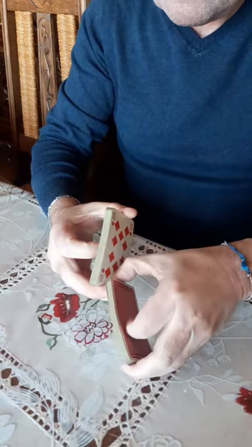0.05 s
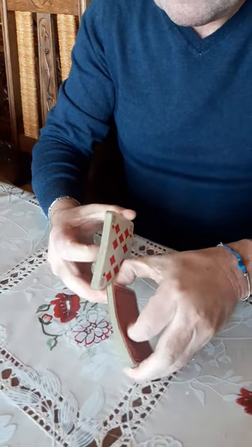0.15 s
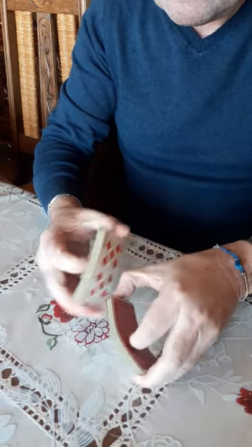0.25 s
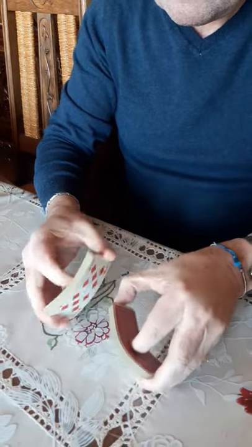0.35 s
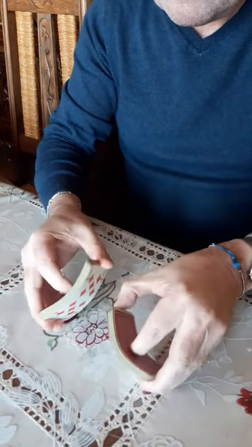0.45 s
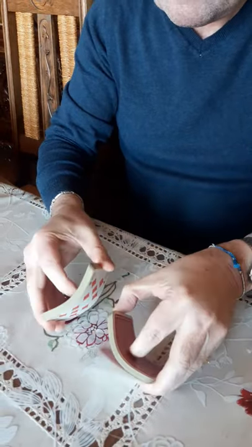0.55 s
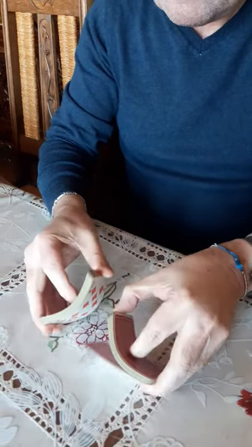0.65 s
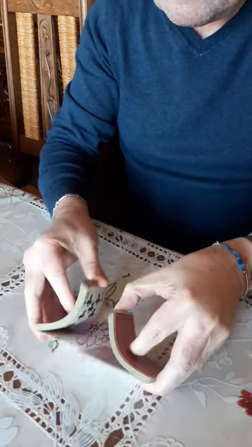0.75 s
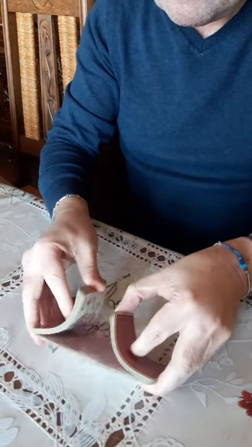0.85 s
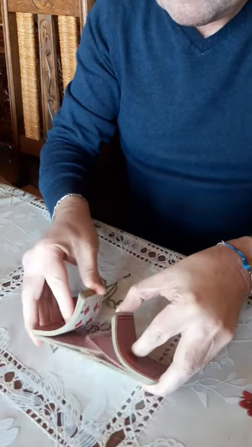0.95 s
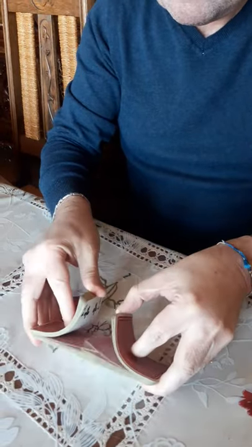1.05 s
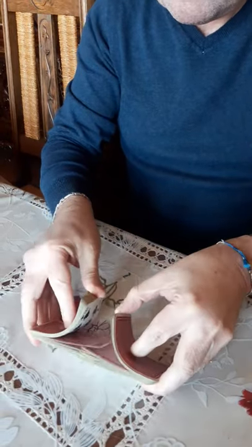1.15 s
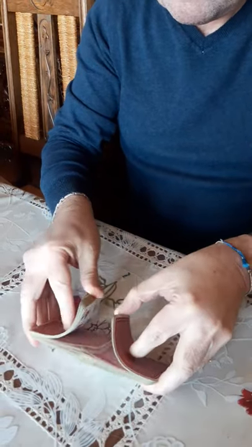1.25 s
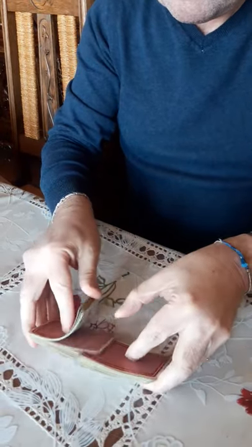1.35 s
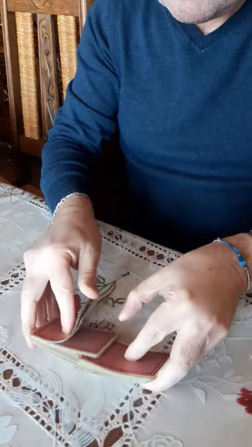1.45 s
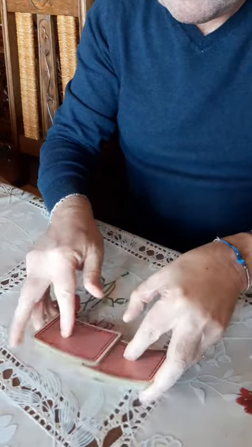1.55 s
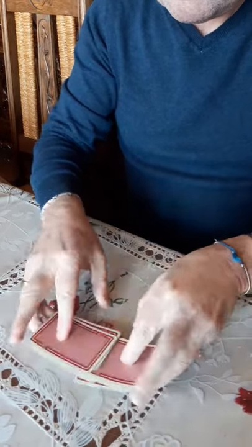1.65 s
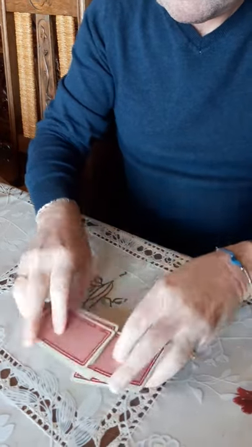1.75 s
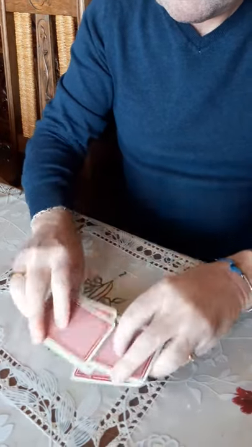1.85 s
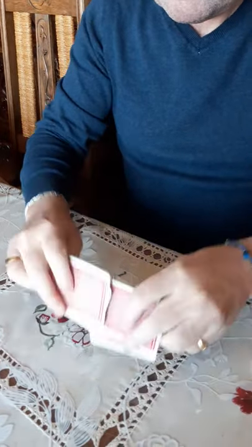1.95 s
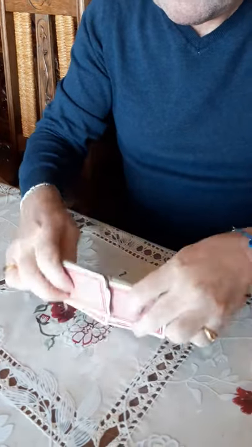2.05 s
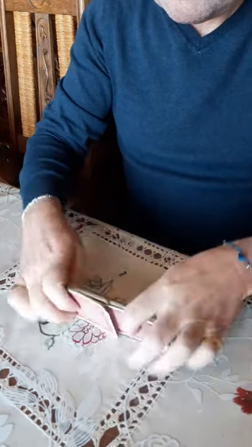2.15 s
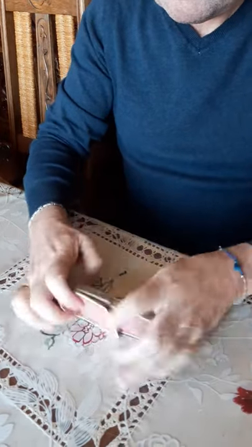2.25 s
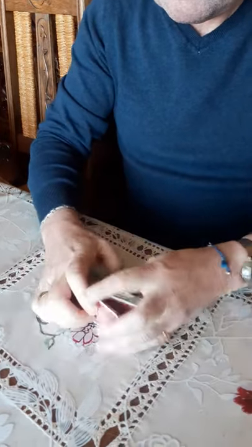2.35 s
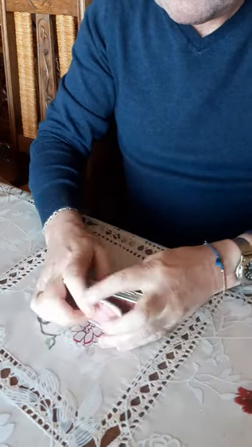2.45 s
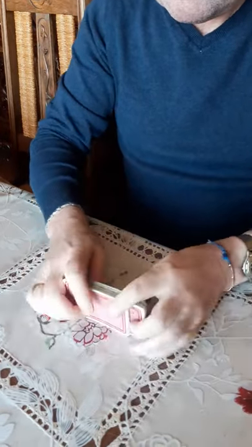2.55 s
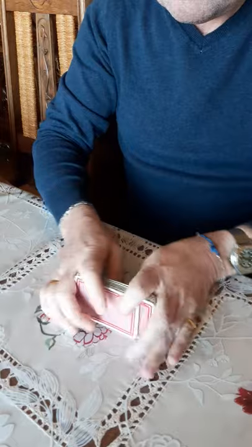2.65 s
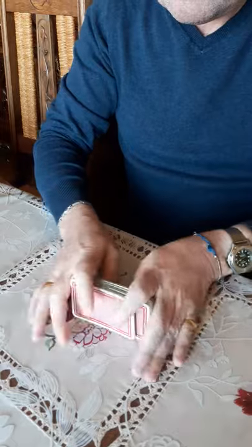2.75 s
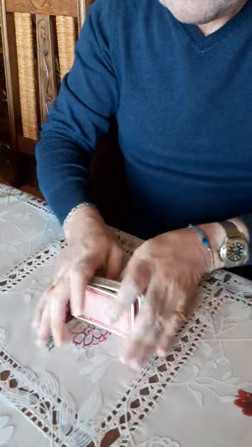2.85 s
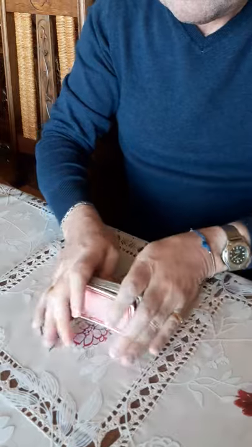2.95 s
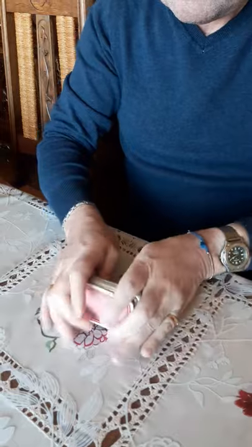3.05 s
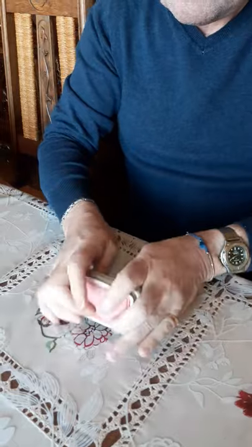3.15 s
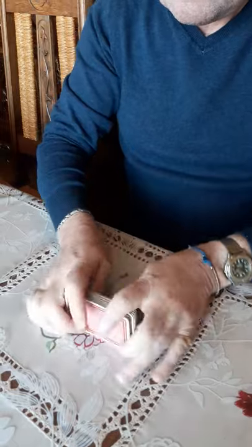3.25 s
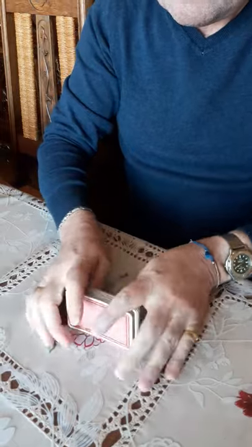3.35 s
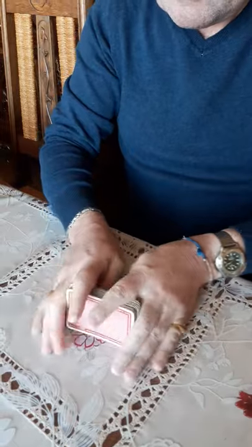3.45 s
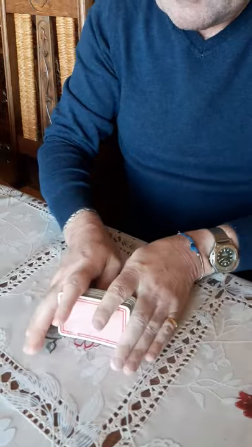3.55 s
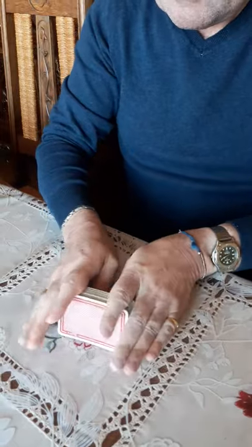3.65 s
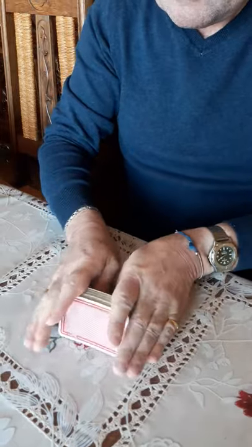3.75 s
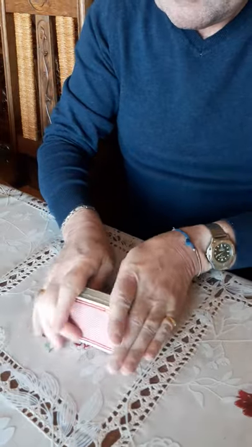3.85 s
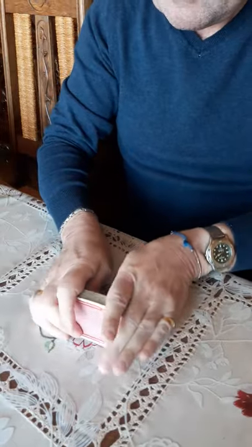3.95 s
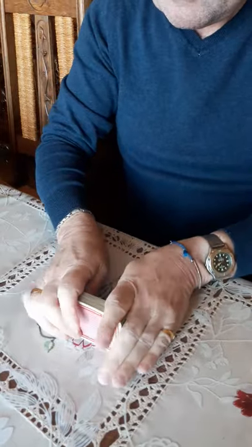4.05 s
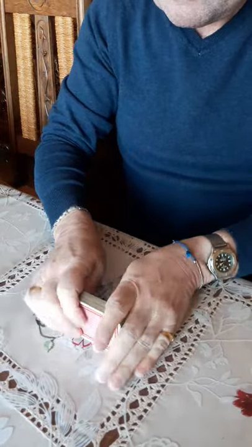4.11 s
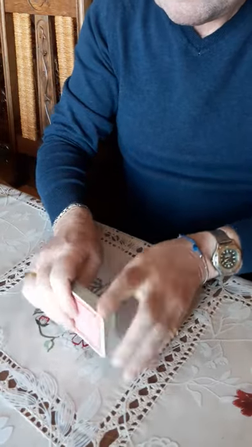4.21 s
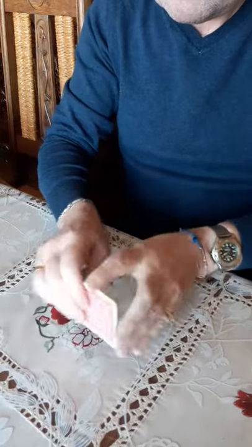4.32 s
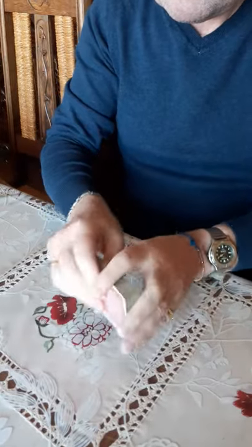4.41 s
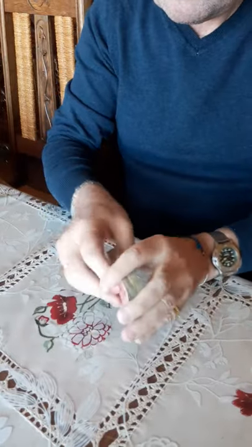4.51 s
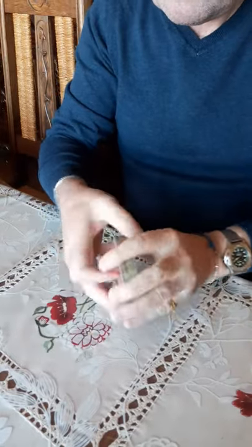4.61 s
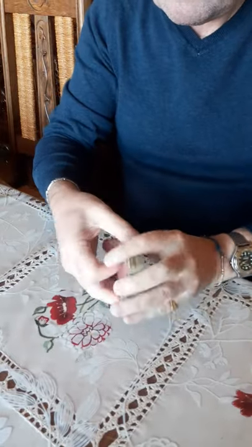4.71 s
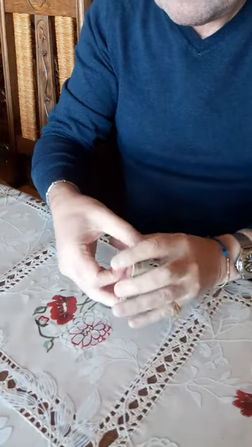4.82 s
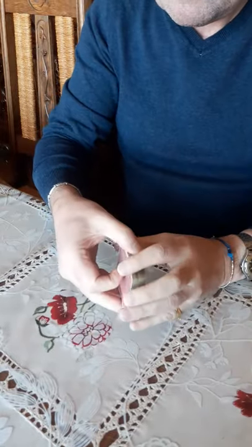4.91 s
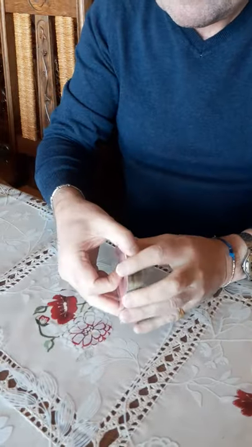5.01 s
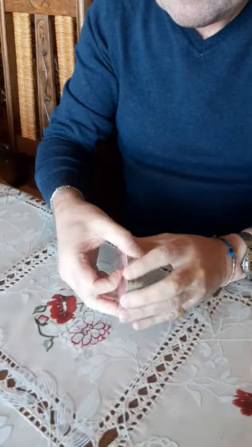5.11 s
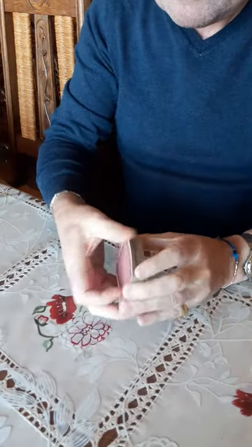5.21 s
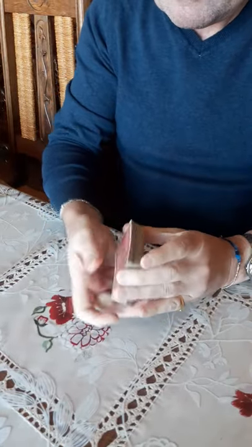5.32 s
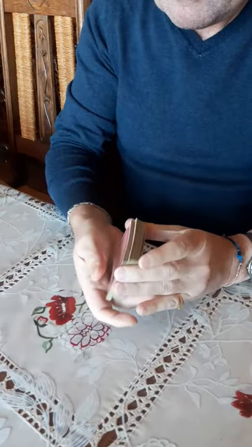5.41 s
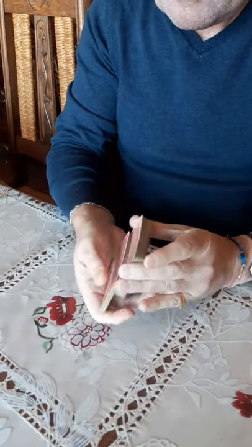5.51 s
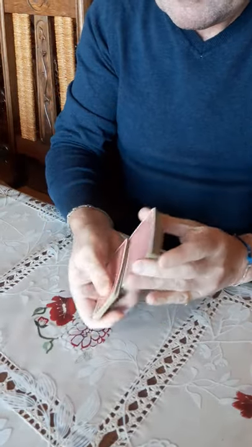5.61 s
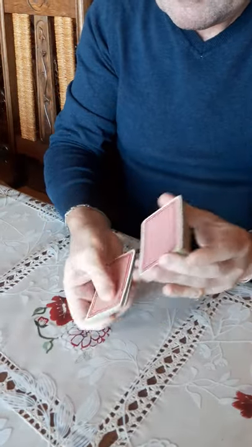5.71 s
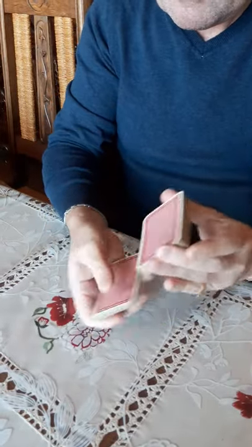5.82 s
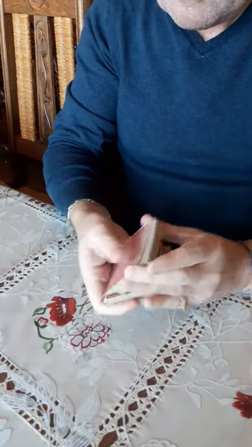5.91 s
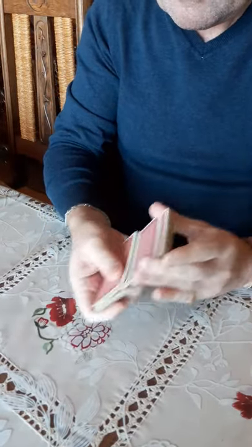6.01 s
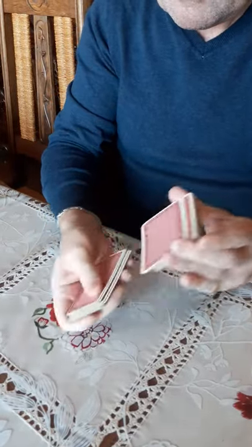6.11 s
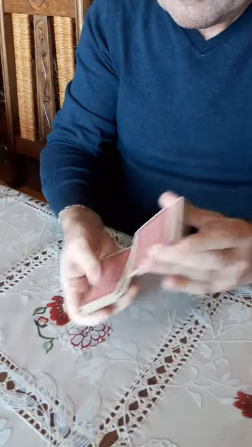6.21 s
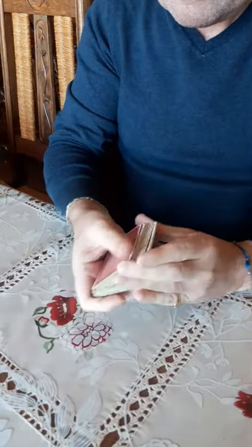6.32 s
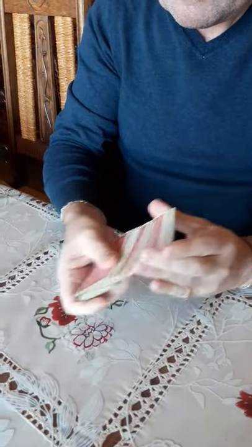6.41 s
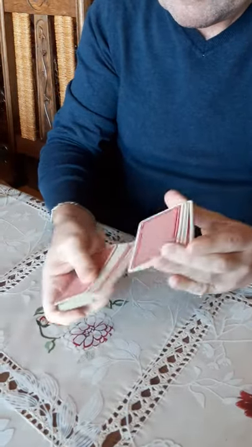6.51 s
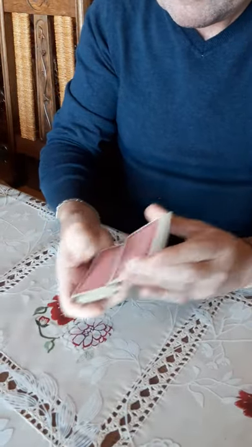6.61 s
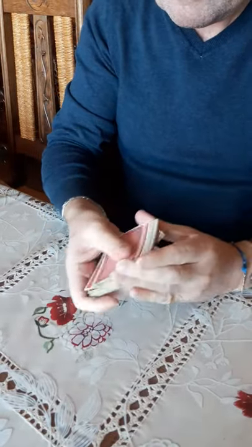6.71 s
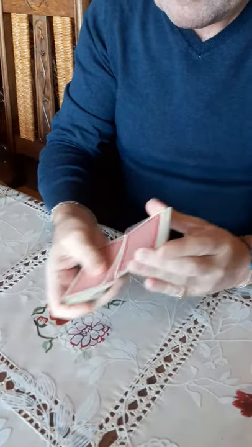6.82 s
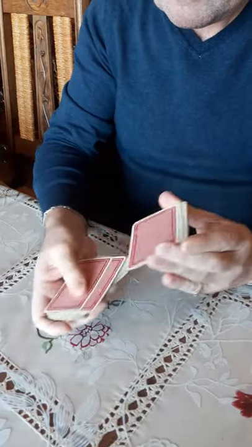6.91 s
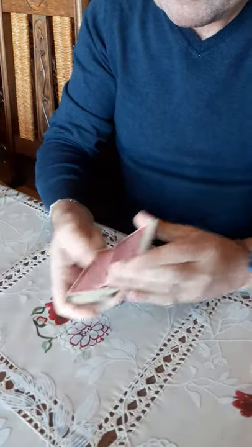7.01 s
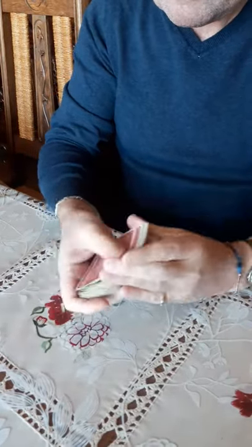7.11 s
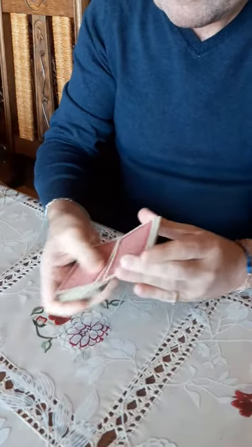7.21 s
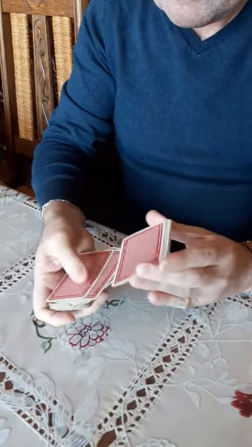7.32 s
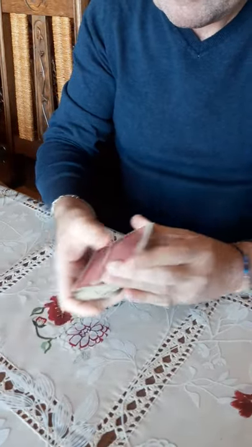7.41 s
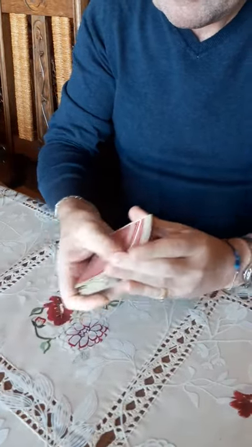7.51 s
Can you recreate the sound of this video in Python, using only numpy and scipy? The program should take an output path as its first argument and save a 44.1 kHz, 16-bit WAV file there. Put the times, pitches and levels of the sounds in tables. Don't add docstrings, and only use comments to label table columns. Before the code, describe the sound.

A phone near the table hears playing cards shuffled by hand indoors. First a bright, uneven riffle of cracking cards and springing packets, knocking the wood dully through the cloth. Next come papery scrapes and ticks as the halves mesh, then one strong woody rap. Faint brushing and small taps lead to light overhand strokes, each a short hiss with clicks. Short room reflections and faint hum surround it, the left side airier, the right more resonant.

```python
import sys
import numpy as np
from scipy import signal
from scipy.fft import rfft, irfft, next_fast_len
from scipy.io import wavfile
from scipy.ndimage import uniform_filter1d

SR = 44100
rng = np.random.default_rng(int(sys.argv[2]) if len(sys.argv) > 2 else 0)


def volts(x):
    e = np.asarray(x, float) / 20
    return 10 ** e


def generate_wav(signal):
    frames = np.transpose(np.atleast_2d(signal))
    scaled = np.clip(frames, -1, 1) * 32767
    pcm = np.round(scaled).astype(np.int16)
    wavfile.write(sys.argv[1], SR, pcm)


N = 333660
TIME = np.arange(N) / SR
QUICK_CLOSING_US = 530


def band(x, hz, width_hz, order=1):
    edges_hz = np.clip([hz - width_hz / 2, hz + width_hz / 2], [15, 30], [0.44 * SR, 0.46 * SR])
    return signal.sosfilt(signal.butter(order, edges_hz, "band", fs=SR, output="sos"), x)


def curve(points, hz):
    points_hz, values = np.transpose(points)
    return np.interp(np.log(hz + 1), np.log(points_hz), values)


def colour(x, points, size=2048):
    gain = volts(curve(points, np.fft.rfftfreq(size, 1 / SR)))
    cepstrum = irfft(np.log(gain))
    cepstrum[1:size // 2] *= 2
    cepstrum[size // 2 + 1:] = 0
    impulse = irfft(np.exp(rfft(cepstrum)))
    return signal.oaconvolve(x, impulse)[:len(x)]


def unit(x):
    return x / np.sqrt(np.mean(x ** 2))


def top(x, db):
    return x * volts(db) / np.max(np.abs(x))


def add(out, s, x):
    i = int(s * SR)
    out[..., i:i + x.shape[-1]] += x[..., :out.shape[-1] - i]


def walk(rate_hz, size=N):
    hold = int(SR / rate_hz)
    levels = np.repeat(rng.standard_normal(size // hold + 1), hold)
    return 1.2 * uniform_filter1d(levels, hold)[:size]


def two_sides(mid, side, like):
    return np.sqrt(1 + like) * mid + np.sqrt(1 - like) * side * np.array([[1], [-1]])


def hum():
    # (frequency [Hz], density [dB per Hz])
    hum_colour = [(25, -7), (60, -12), (110, -4), (160, 2), (210, -2.5), (300, 2), (650, -7.5),
                  (800, -13.5), (1080, -5.5), (1200, -18), (1400, -17.5), (2300, -21.5), (2700, -33),
                  (3300, -38), (8000, -30.5), (14000, -24.5)]
    # (frequency [Hz], likeness [0-1])
    hum_likeness = [(60, 0.5), (130, 0.9), (640, 0.6), (1400, 0.06), (3000, 0.03), (16000, 0.3)]
    # (time [s], level [dB])
    hum_level = [(0, -67.5), (.5, -66), (1.7, -70), (1.9, -72.5), (2.6, -69.5), (3.2, -67), (3.7, -68),
                 (4.6, -69), (6.2, -67.5), (7.57, -70)]
    size = next_fast_len(N)
    hz = np.fft.rfftfreq(size, 1 / SR)
    like = np.clip(curve(hum_likeness, hz), 0, 1)
    mid, side = rfft(rng.standard_normal((2, size))) * volts(curve(hum_colour, hz))
    both = two_sides(mid, side, like)
    out = 0
    for centre_hz in 30 * 2 ** np.arange(0, 9.5, 0.5):
        share = np.clip(1 - 2 * np.abs(np.log2((hz + 1) / centre_hz)), 0, 1)
        out = out + irfft(both * share, size)[:, :N] * volts(1.7 * walk(4.6))
    return unit(out) * volts(np.interp(TIME, *np.transpose(hum_level)) + 0.5)


def room(feed, size=30000):
    # (frequency [Hz], t60 [s], level [dB])
    room_bands = [(127, 0.46, -5), (370, .42, 1.5), (1000, 0.42, -3.5), (2600, 0.26, -27),
                  (6440, 0.33, -7.5), (12400, 0.23, -6)]
    # (frequency [Hz], likeness [0-1])
    room_likeness = [(125, .97), (350, .75), (1000, .45), (2500, .3), (12000, .05)]
    build_s = 0.0086
    t, tail = TIME[:size], 0
    mid, side = rng.standard_normal((2, size))
    for hz, t60_s, db in room_bands:
        walls = two_sides(mid, side, curve(room_likeness, hz))
        fade = volts(db - 60 * t / t60_s) / np.sqrt(t60_s * SR / 9)
        tail = tail + fade * band(walls, hz, 1.2 * hz, order=2)
    return signal.oaconvolve(feed[None], tail * np.minimum(t / build_s, 1), axes=1)[:, :N]


def rush(rows, alike=0, size=16000):
    out, t = np.zeros((2, N)), TIME[:size]
    for s, db, hz, width_hz, t60_s in rows:
        for side in out:
            grains = rng.standard_normal(size) * volts(2.5 * walk(300, size=size))
            add(side, s, unit(band(grains, hz, width_hz, order=2)) * volts(db - 60 * t / t60_s))
    return out + alike * (out.mean(axis=0) - out)


def table_booms():
    # (time [s], level [dB], centre [Hz], width [Hz], t60 [s])
    boom_events = [
        (1.7, -58, 66, 85, 0.21),
        (3.8, -62, 39, 47, 0.34),
        (3.3, -51, 240, 120, 0.63),
        (1.6, -56, 131, 60, 0.54),
        (3.99, -59, 78, 62, 0.31),
    ]
    return rush(boom_events, alike=0.92)


def scrapes():
    # (time [s], level [dB], centre [Hz], width [Hz], t60 [s])
    scrape_events = [
        (.59, -48, 2760, 2060, 0.25),
        (.733, -48, 2760, 1780, 0.66),
        (.734, -42, 2380, 496, .25),
        (.857, -41, 3200, 2000, 0.25),
        (3.265, -56, 1870, 890, 0.49),
        (3.84, -73.5, 1455, 901, 1),
    ]
    return rush(scrape_events)


def paper_rushes():
    # (time [s], level [dB], centre [Hz], width [Hz], t60 [s])
    rush_events = [(0.711, -49.5, 4060, 6000, 0.023), (0.866, -33.5, 3240, 1000, 0.38),
                   (0.868, -29.5, 4500, 4530, 0.28), (1.5, -48.5, 2920, 1600, 0.31),
                   (1.287, -48, 3380, 5980, 0.195), (1.329, -35, 3940, 7400, 0.35),
                   (1.371, -43, 6130, 1590, 0.12), (2.133, -52.5, 908, 1540, 0.414),
                   (3.262, -40, 594, 288, 0.41), (3.835, -65, 2550, 399, 0.15),
                   (4.336, -73.5, 1633, 880, .3), (4.887, -65, 11150, 9000, 0.024),
                   (4.888, -67.5, 11520, 6960, .4), (4.39, -72.5, 11980, 7000, 0.73)]
    return rush(rush_events)


def strokes(step):
    # (peak time [s], hiss [dB], rise [s], fall [s], dull rub re hiss [dB])
    brushes = [(.375, -74.5, 0.13, 0.19, -2.5), (1.66, -83, 0.01, 0.8, 5), (1.9, -81.5, .3, 0.35, -1.5),
               (2.95, -75, 0.23, 0.4, 7.5), (3.12, -74, 0.13, .12, 1), (3.85, -75.5, 0.028, 1, 4),
               (4.15, -74, 0.46, 0.41, -6.5), (4.33, -92.5, 0.31, 0.18, -5), (4.53, -79.5, 0.054, .7, -3),
               (4.74, -80, 0.3, .11, -11), (5.44, -80, 0.25, 0.16, -0.5)]
    pushes = [(2.05, -67, 0.016, 0.029, 6), (2.175, -55.5, 0.054, 0.029, 2), (2.137, -65, 0.0042, 0.2, -13),
              (2.37, -57, 0.071, 0.088, 1), (2.333, -63, 0.039, 0.13, 2.5), (2.41, -69, 0.11, 0.11, 9.5),
              (2.56, -60, 0.119, 0.1, 1.26), (2.67, -57, 0.06, 0.13, 0), (2.86, -65.5, 0.17, 0.11, 4),
              (3.262, -42.5, 0.0068, 0.0079, 6.5), (3.28, -57.5, 0.04, 0.19, -8),
              (3.49, -59.5, 0.14, 0.11, -5.5), (3.57, -73.5, 0.048, 0.36, 5),
              (4.42, -90, 0.14, 0.074, -5.5), (4.89, -83, 0.01, 0.142, -9), (1.78, -70.5, 0.034, 0.06, 5),
              (5.64, -74, .06, .18, -1.54)]
    cuts = [(5.937, -61, 0.012, 0.14, 5), (6.1, -62, 0.099, 0.03, 4), (6.14, -76.5, 0.021, 0.16, -2),
            (6.297, -59, .004, 0.17, -3), (6.33, -68, 0.035, 0.18, 12.5), (6.492, -55, 0.047, 0.037, -1),
            (6.54, -72.5, 0.017, 0.094, 12), (6.655, -56.5, 0.003, 0.139, 8), (6.7, -65, 0.061, 0.07, 10),
            (6.86, -53.5, 0.049, 0.039, 0.5), (6.81, -60, 0.029, 0.108, -4.5), (7.088, -66, 0.026, .06, 6),
            (6.47, -71.5, 0.048, 0.065, 6.5), (6.92, -72.5, 0.019, 0.18, -0.5),
            (7.065, -58.5, 0.0025, 0.13, 7.5), (7.15, -63, 0.068, 0.17, 2), (7.26, -61.5, 0.17, 0.04, -0.5),
            (7.46, -64, 0.011, 0.13, 1), (7.522, -60.5, .005, 0.13, 0.5)]
    fizz_slowness = 1.5
    t, power = TIME[::step], 1e-14
    for rows, fizz_db in ((brushes, -14), (pushes, -12), (cuts, -10)):
        for s, db, rise_s, fall_s, rub_db in rows:
            fade_db = -20 * np.where(t < s, (s - t) / rise_s, (t - s) / fall_s)
            levels_db = db + np.array([fade_db, fade_db + rub_db, fade_db / fizz_slowness + fizz_db])
            power = power + volts(levels_db) ** 2
    return [np.interp(TIME, t, gain) for gain in np.sqrt(power)]


def slides():
    out, (hiss, dull, fizz) = np.zeros((2, N)), strokes(step=64)
    for patch in out:
        grains = np.minimum(rng.exponential(size=N // 40 + 1), 4).repeat(40)[:N]
        rub = rng.standard_normal(N) * volts(2.3 * grains + 1.3 * walk(40))
        patch += hiss * volts(-4) * unit(band(rub, 5750, 2000, order=2) + 0.9 * band(rub, 6600, 4400, order=2))
        patch += dull * volts(-8.5) * unit(band(rub, 2300, 700, order=2) + 0.88 * band(rub, 3600, 3000))
        patch += fizz * volts(7.5) * unit(band(rub, 11000, 8800, order=2))
    return out + 0.17 * out[::-1]


def table_thuds(size=11025):
    # (time [s], level [dB], favoured ring [Hz])
    thuds = [(0.5871, -23.5, 285), (0.626, -30.5, 164.5), (0.724, -35.5, 610), (0.786, -26.5, 266),
             (0.845, -30.5, 595), (0.898, -29.5, 244), (0.954, -28, 230), (1.031, -41, 598),
             (1.074, -27.5, 291), (1.132, -33.5, 160), (1.202, -31, 320), (1.291, -33, 285),
             (1.346, -32.5, 167), (1.401, -31.5, 285), (1.456, -32, 267), (1.495, -33, 605.5),
             (1.539, -30, 253), (1.76, -48.5, 274), (2.149, -47, 199.6), (2.186, -39.5, 246.4),
             (3.26, -22.5, 620), (3.2673, -20.5, 156), (3.287, -23, 152), (3.488, -58.5, 166),
             (3.842, -60.5, 162.7), (3.983, -35.5, 231), (4.03, -45, 296.6), (5.623, -50, 295.7),
             (6.09, -58, 722), (6.326, -47, 282)]
    # (frequency [Hz], level [dB], t60 [s])
    table_modes = [(158.0, 0.5, 0.92), (185, -7.5, 0.13), (230.3, -17.0, 0.2425), (285, -10, 0.66),
                   (417, -19.5, 0.38), (519.8, -16.5, 0.94), (594, -8.5, 0.9), (753.0, -15.5, 0.36),
                   (775.8, -21.5, 0.3), (873, -24.5, 0.2215), (62.74, -19, 0.22), (118.73, -12.0, 0.083),
                   (280.0, -3.5, 0.57), (492.7, -7.0, 0.71)]
    contact_s, damping = 0.0014, 5
    out, t = np.zeros(N), TIME[:size]
    push = np.sin(np.pi * t[t < contact_s] / contact_s)
    hz, db, t60_s = np.transpose(table_modes)[:, :, None]
    spots = rng.standard_normal((len(thuds), 2, len(table_modes), 1))
    cloth = rng.standard_normal((len(thuds), size))
    for (s, blow_db, ring_hz), spot, puff in zip(thuds, spots, cloth):
        scatter_db, detune = 2 * spot[0], 1 + 0.02 * spot[1]
        mix = volts(db + scatter_db - 21 * np.abs(np.log2(hz / ring_hz)))
        modes = mix * np.sin(2 * np.pi * hz * detune * t) * volts(-60 * t / (t60_s / damping))
        dull = band(puff, 1.15 * ring_hz, 1.4 * ring_hz, order=2) * volts(-60 * t / 0.16)
        body = top(np.sum(modes, axis=0), 0) + top(dull, -3)
        add(out, s, top(signal.oaconvolve(body, push), blow_db - 5))
    return out


def clean_rings(size=22050):
    # (time [s], level [dB], frequency [Hz], t60 [s])
    ring_events = [(0.588, -45, 2940, 0.0059), (.7868, -20, 905, 0.013), (.8445, -17, 2330, 0.016),
                   (.866, -10.5, 2387, 0.012), (1.131, -34, 2390, 0.01), (1.221, -48, 2300, 0.0364),
                   (1.342, -37, 2334, 0.016), (1.354, -23, 2210, 0.014), (1.3646, -3, 6160, .004),
                   (1.3734, -20.5, 5900, .012), (1.4558, -46, 2300, 0.017), (1.5055, -33, 2350, .014),
                   (3.29, -40, 623, 0.35), (3.291, -46, 156, 0.33), (5.9356, -52, 2190, 0.017),
                   (6.5292, -48.5, 2108, 0.018), (6.653, -54, 2360, 0.016), (6.7038, -61, 2390, 0.014),
                   (6.8605, -54, 2243, 0.094), (7.0632, -45.5, 5500, .01), (7.2645, -59.5, 2480, .03),
                   (7.5195, -63.5, 2270, 0.014), (3.4965, -59.5, 5790, .012), (6.661, -57.5, 2290, 0.0093),
                   (6.859, -55.5, 1000, 0.0615), (.5895, -34, 790, 0.049), (1.078, -36, 1018, 0.0324),
                   (3.2605, -30, 6750, 0.0047), (0.5867, -22, 5580, 0.0033), (0.5858, -22, 1510, .006),
                   (0.627, -33, 5500, .005), (3.2605, -31, 3330, .008), (3.286, -46, 3660, .015),
                   (1.3475, -24, 5900, .006), (1.38, -25, 5546, .008), (6.6615, -53, 2300, .008),
                   (2.494, -56, 4490, 0.0056)]
    rise_cycles = 1.5
    out, t = np.zeros(N), TIME[:size]
    for s, db, hz, t60_s in ring_events:
        cycles = hz * np.cumsum(1 + 0.03 * walk(hz / 6, size=size)) / SR
        swell = 1 - np.exp(-t * hz / rise_cycles)
        add(out, s, np.sin(2 * np.pi * cycles) * swell * volts(db - 0.5 - 60 * t / t60_s))
    return out


def snaps(events, size=1400):
    unlike = 0.5
    out, t = np.zeros((3, N)), TIME[:size]
    noises = rng.standard_normal((len(events), 3, size))
    for (s, db, hz, edge_db, slap_db, closing_us), noise in zip(events, noises):
        air = noise[:, None] + unlike * noise[:, None, ::-1] * np.array([[1], [-1], [0]])
        closing = t * np.exp(-t * 1e6 / max(closing_us, 100))
        squeeze = air[0]
        if closing_us > 1300 and edge_db < -30:
            squeeze = squeeze + 0.55 * np.sin(2 * np.pi * hz * t) * np.array([[1], [1], [0]])
        width_hz = hz * np.clip(420 / closing_us, 0.4, 1.2)
        pocket = band(squeeze * closing, hz, width_hz, order=2)
        broad = band(air[0] * closing ** 2, 3600, 8800)
        edge = band(air[1] * t * np.exp(-t / (0.00011 + closing_us * 5e-7)), 11000, 11000, order=2)
        slap = band(air[2] * closing, 1050, 1100, order=2)
        crack = top(broad, db + 0.58 * edge_db) + top(edge, db + edge_db + 14)
        add(out, s, top(pocket, db - 12.5) + crack + top(slap, db + slap_db + 2.5))
    return out


def nicks():
    # (time [s], pocket [dB], pocket [Hz], edge crack re pocket [dB], pile slap re pocket [dB])
    nick_events = [(.5862, -17, 4200, -24, -15), (0.7242, -27, 5540, -11, -5),
                   (.7375, -21.5, 2180, -18, -27), (0.7447, -22, 5600, -20, -28),
                   (0.868, -1, 4900, -34, -42), (0.8699, -8, 2330, -46, -32), (1.0345, -25, 1692, -15, -8),
                   (1.082, -23, 2300, -25, -5), (1.1318, -14, 1990, -15, -17),
                   (1.2998, -30, 2200, -10, -5.5), (1.3315, -21.5, 3000, -8, -25),
                   (1.3668, -12.5, 5460, -32, -22.5), (1.3735, -20, 5900, -32, -39),
                   (1.3865, -26, 5800, -26.5, -28.5), (1.4645, -34, 2300, -33, -30),
                   (1.4993, -18, 2324, -16.5, -9.5), (1.7765, -55.5, 2410, -20.5, -16.5),
                   (2.133, -40, 5580, -29, -26.5), (2.1375, -34, 2240, -40.5, -22),
                   (2.1565, -28, 5600, -42, -34), (2.2215, -54, 2310, -22, -18),
                   (2.299, -49.5, 5570, -20.5, -24), (2.331, -45.5, 2380, -27, -23),
                   (2.6545, -47.5, 5570, -21, -26.5), (3.2596, -22.5, 2320, -18.5, -42),
                   (3.8308, -53.5, 2380, -25, -18), (3.8432, -47.5, 2552, -24.5, -7),
                   (4.8856, -67, 6000, 3, -31), (5.9048, -53, 5480, -28, -27.5),
                   (6.1035, -47.5, 2290, -21.5, -19.5), (6.4679, -46, 2300, -30.5, -26),
                   (6.485, -50, 2296, -22.5, -23), (6.5292, -39.5, 2110, -32, -33),
                   (6.5378, -49, 2150, -33, -29), (6.7042, -31.5, 2430, -25, -40),
                   (6.704, -30.5, 5860, -34, -30), (6.8062, -47, 5900, -21, -27),
                   (7.072, -43, 2210, -24.5, -27.5), (7.087, -36, 5680, -27.5, -28),
                   (7.256, -43, 2380, -13, -21), (3.4958, -46.5, 5900, -6, -30),
                   (5.6248, -60, 5000, -11.5, -20), (5.305, -67, 6000, -12, -29.5)]
    return snaps([(*row, QUICK_CLOSING_US) for row in nick_events])[:2]


def cards():
    # (time [s], pocket [dB], pocket [Hz], edge crack re pocket [dB])
    flicks = [(0.5935, -31.5, 2078, -25.5), (0.6685, -37, 1783, -18.5), (0.776, -34, 1940, -18.5),
              (0.8034, -22.5, 1886, -20), (0.8667, -5.5, 2525, -27.5), (0.9016, -15.5, 3453, -22.5),
              (0.9448, -21.5, 2290, -25), (1.0755, -14.5, 2200, -16.5), (1.196, -24.5, 2430, -15),
              (1.3451, -27, 5820, -7.5), (1.3533, -10.5, 2210, -21), (1.3645, 2, 6300, -19),
              (1.399, -19.5, 5642, -27.5), (1.4192, -21.5, 2190, -23), (1.4474, -33, 6080, -21.5),
              (1.4558, -13, 2110, -39), (1.4968, -3, 2110, -34.5), (1.5344, -25.5, 1530, -17.5),
              (1.5417, -16.5, 2310, -38)]
    # (time [s], pocket [dB], pocket [Hz], edge crack re pocket [dB])
    flops = [(0.5774, -47.5, 2219, -22.5), (0.5863, -17, 3215, -21), (0.5896, -14.5, 1677, -30),
             (0.6054, -33, 2075, -14), (0.6265, -30, 2340, -16), (0.6337, -33.5, 1751, -13.5),
             (0.7285, -7.5, 2400, -45), (0.7427, -27, 2281, -26), (0.7867, -14.5, 1524, -26.5),
             (0.8709, -10.5, 3487, -30), (0.9182, -16.5, 3091, -27.5), (0.9608, -21.5, 3497, -19.5),
             (1.0318, -24.5, 2128, -10.5), (1.0683, -29, 5726, -14), (1.0799, -19, 2299, -25),
             (1.1315, -13.5, 2349, -17.5), (1.298, -23, 2204, -24.5), (1.373, -17.5, 5950, -26.5),
             (1.4876, -27, 2380, -13), (1.5052, -18, 2353, -22), (1.5158, -19.5, 2170, -28),
             (1.5274, -32, 2335, -30.5)]
    # (time [s], pocket [dB], edge crack re pocket [dB], pile slap re pocket [dB])
    packets = [
        (0.7232, 0, -85, -52),
        (0.8445, -7, -20.5, -34),
        (0.9537, -18.5, -21, -14.5),
        (1.2039, -19.5, -13.5, -7.5),
        (1.221, -12.5, -23, -15.5),
        (1.3391, -15.5, -22, -14),
        (6.5291, -49.5, -18, -8),
        (6.8613, -36, -22, -15.5),
        (7.2638, -47, -13, -12.5),
    ]
    ticks = [(1.7105, -65.5, -20.5, -20), (1.7186, -57.5, -14, -20.5), (2.0461, -51, -30, -11.5),
             (2.0953, -53, -13, -28.5), (2.138, -56, -31.5, -7), (2.156, -40, -31.5, -20),
             (2.2108, -60, -25, -1), (2.3268, -52.5, -26.5, -10.5), (3.249, -43.5, -33.5, -28.5),
             (3.2603, -18, -43, -42), (3.9814, -51.5, -30.5, -3), (4.0317, -47.5, -31.5, -8),
             (4.337, -60, -38, -4), (5.6253, -61, -29.5, 5)]
    knocks = [(5.882, -57.5, -26.5, -0.5), (5.9061, -70.5, -15, 5), (5.9354, -40, -14.5, -11),
              (5.9754, -45, -16, -10), (6.056, -52, -31, -3), (6.094, -45, -5.5, -0.5),
              (6.2959, -44, -9.5, -11), (6.6532, -39, -20.5, -31.5), (6.6599, -40, -12.5, -21),
              (6.6675, -39, -10.5, -11.5), (6.703, -36.5, -16, -13), (7.0836, -40, -30, -12),
              (7.1317, -47, -15, -9), (7.1447, -41, -12.5, -13.5), (7.5193, -39.5, -11.5, -17),
              (7.5275, -49, -11.5, -21)]
    corners = [
        (2.1365, -31, -37, -29),
        (2.4932, -44, -23, -25),
        (3.4966, -45.5, 0.5, -25.5),
        (6.335, -40, -15.5, -35),
        (7.0642, -30, -27.5, -18.5),
        (7.4629, -49.5, -11, -31.5),
    ]
    slap_re_db, slap_follows = -26, 0.41
    events = []
    for rows, closing_us in ((flicks, 631.5), (flops, 1300)):
        for s, db, hz, edge_db in rows:
            events.append((s, db, hz, edge_db, slap_re_db + (slap_follows - 1) * db, closing_us))
    kinds = ((packets, 2380, 1700), (ticks, 2330, QUICK_CLOSING_US), (knocks, 2290, QUICK_CLOSING_US),
             (corners, 5800, QUICK_CLOSING_US))
    for rows, hz, closing_us in kinds:
        for s, db, edge_db, slap_db in rows:
            events.append((s, db, hz, edge_db, slap_db, closing_us))
    return snaps(events)


def scene():
    deck, wood = cards(), table_thuds()
    background = hum() + room(deck[2] + volts(-5.5) * wood)
    paper = paper_rushes() + scrapes() + slides()
    return background + paper + table_booms() + wood + clean_rings() + nicks() + deck[:2]


def band_limit(x):
    return signal.sosfilt(signal.butter(12, 17140, fs=SR, output="sos"), x)


def record(dry):
    # (frequency [Hz], gain [dB])
    left_port = [(200, 2.5), (350, -1), (700, 5.5), (1500, 3.5), (2400, 3.5), (3400, 10), (6000, 4),
                 (9000, -2.5), (15000, -0.5)]
    # (frequency [Hz], gain [dB])
    right_port = [(200, 1.5), (1500, 5), (2050, 11), (2390, 15.5), (2700, 7.5), (4200, 9), (5700, 11),
                  (6600, 2), (8500, -14), (15000, -11)]
    # (frequency [Hz], phase [rad])
    duct_lead = [(100, 0), (700, .3), (1100, .3), (1700, 1.4), (2700, 1.6), (3500, 1), (4800, 0)]
    left_lead_samples, rumble_cut_hz, top_hz = 5, 70, 16100
    left = np.roll(colour(dry[0], left_port), -left_lead_samples)
    size = next_fast_len(N)
    duct = np.exp(1j * curve(duct_lead, np.fft.rfftfreq(size, 1 / SR)))
    right = irfft(rfft(colour(dry[1], right_port), size) * duct, size)[:N]
    ports = np.array([left, right])
    ports = signal.sosfilt(signal.butter(2, rumble_cut_hz, "high", fs=SR, output="sos"), ports)
    ports = ports / (1 + ports ** 4) ** 0.25
    ports = signal.sosfilt(signal.ellip(8, 0.2, 30, top_hz, fs=SR, output="sos"), ports)
    return band_limit(ports)


dry = scene()
out = record(dry)
generate_wav(out)
```